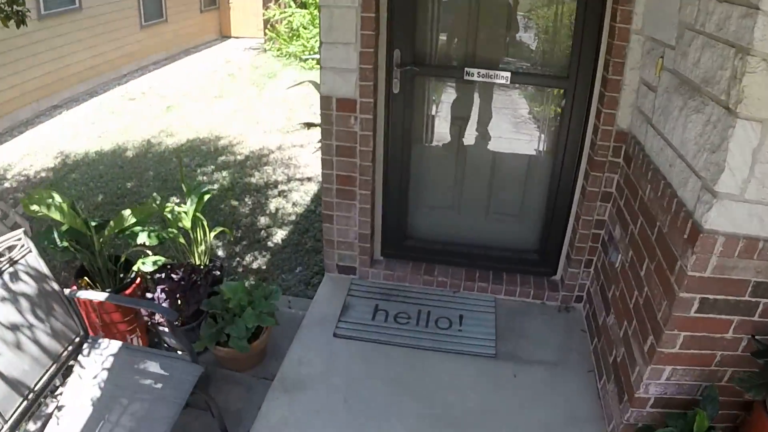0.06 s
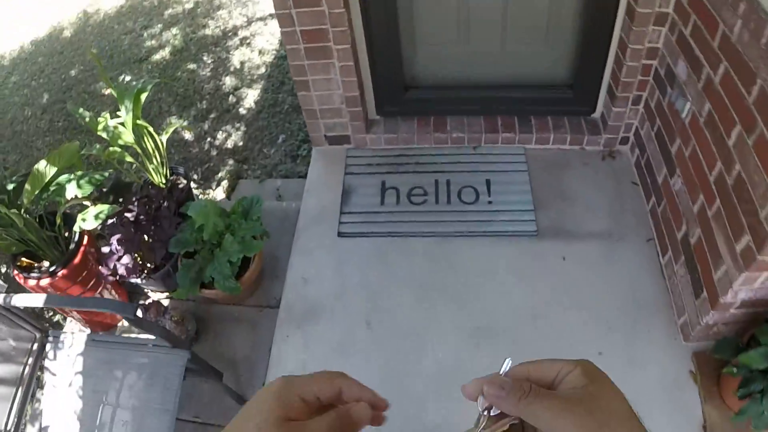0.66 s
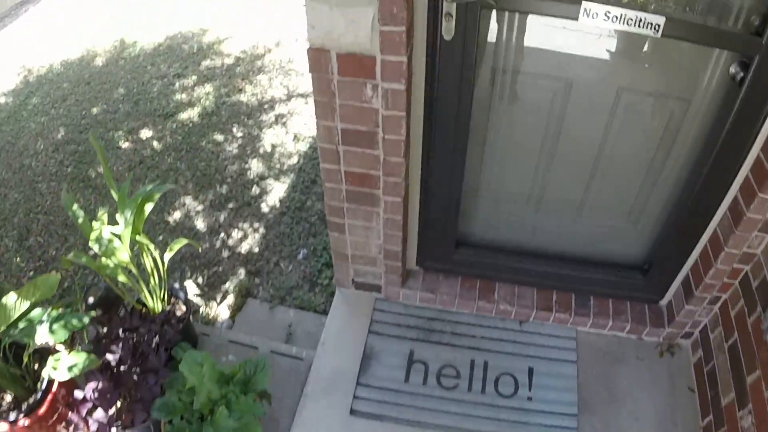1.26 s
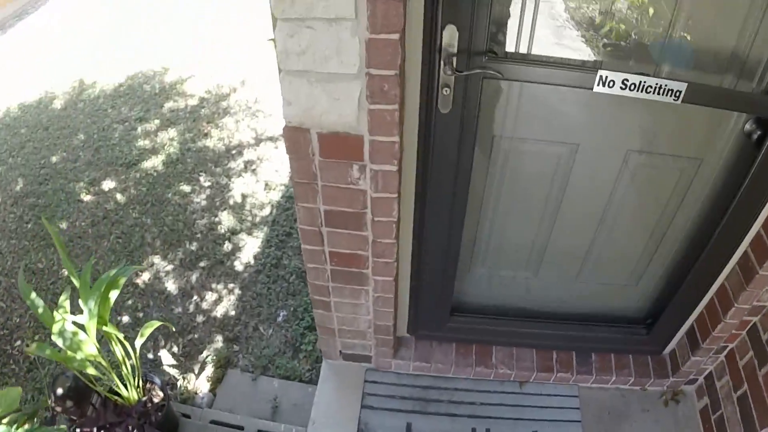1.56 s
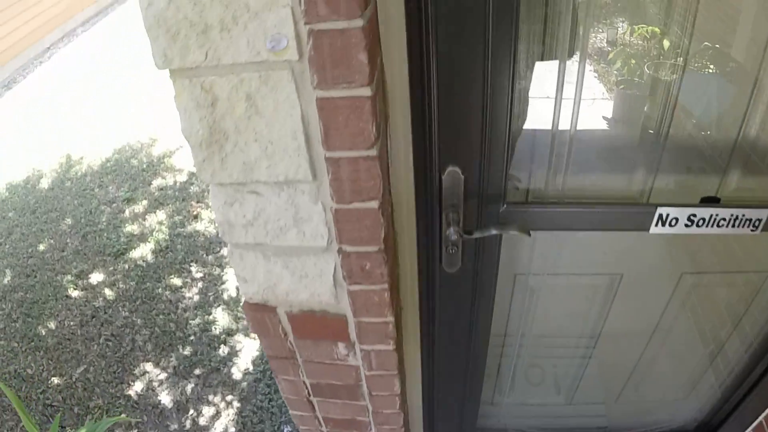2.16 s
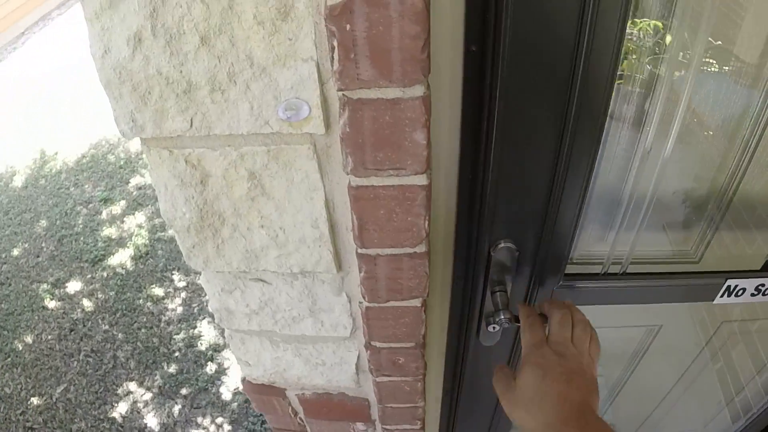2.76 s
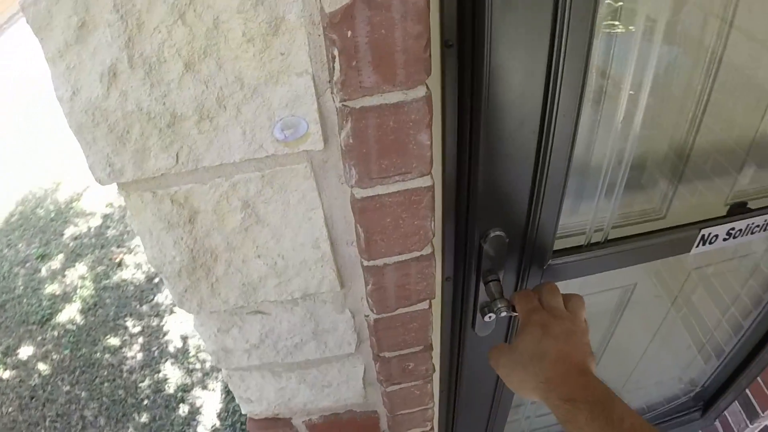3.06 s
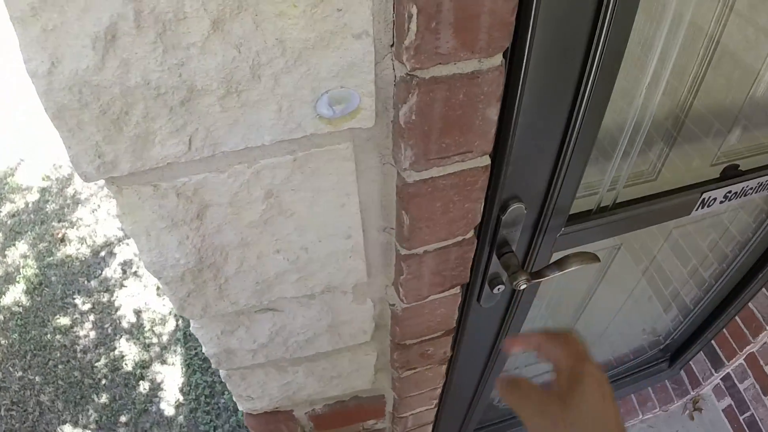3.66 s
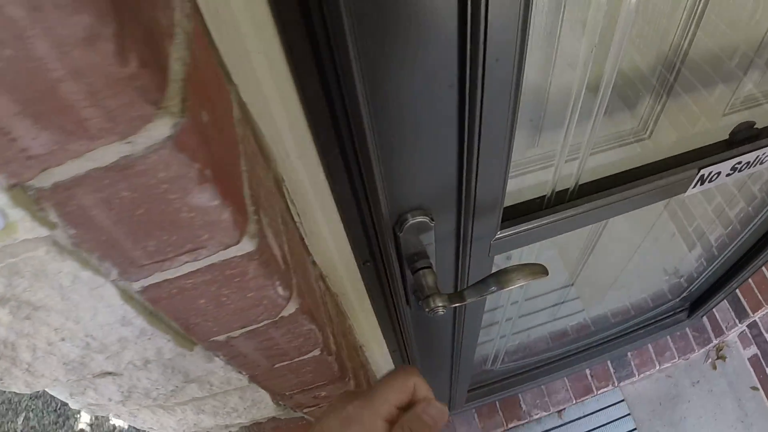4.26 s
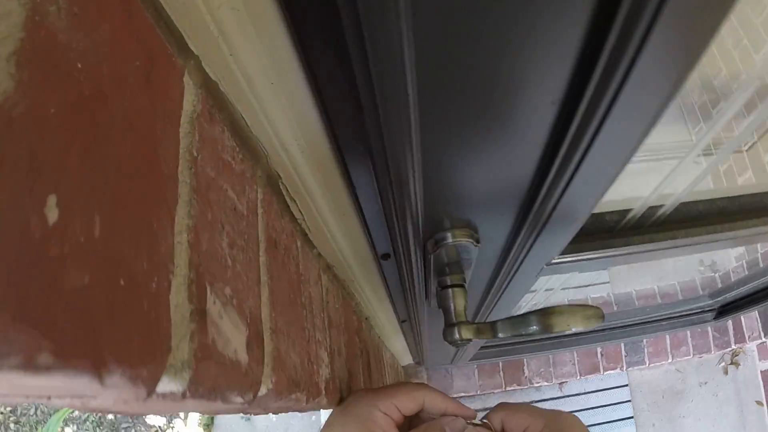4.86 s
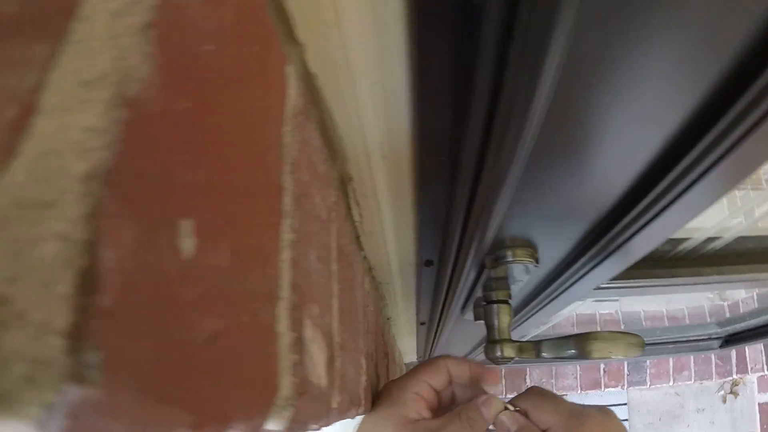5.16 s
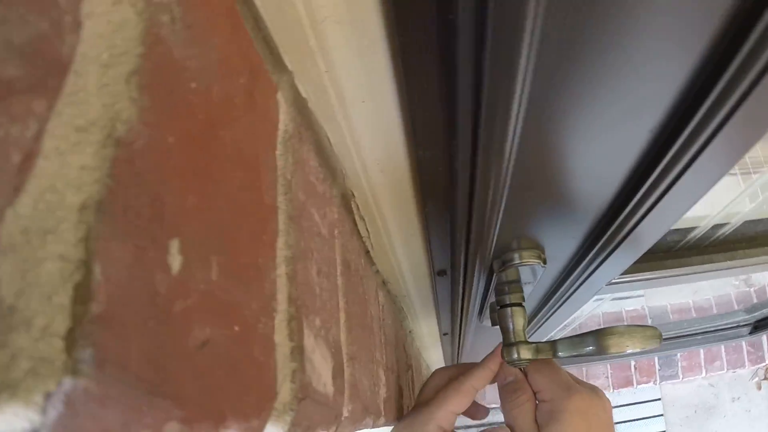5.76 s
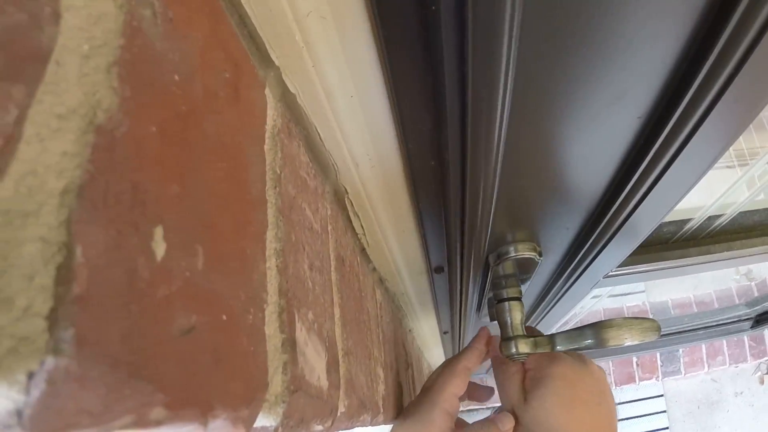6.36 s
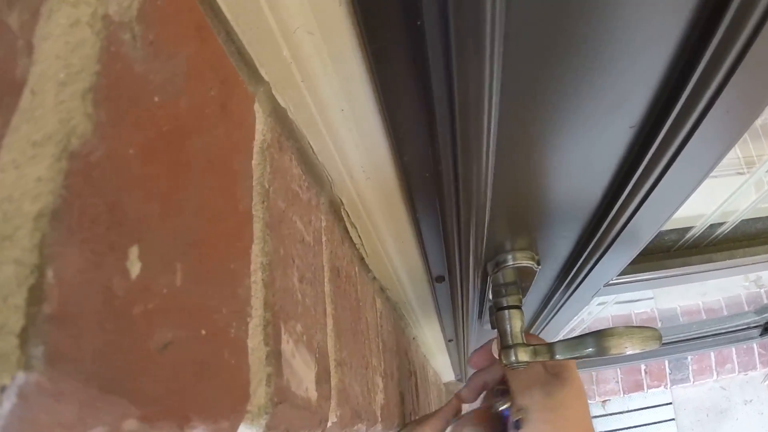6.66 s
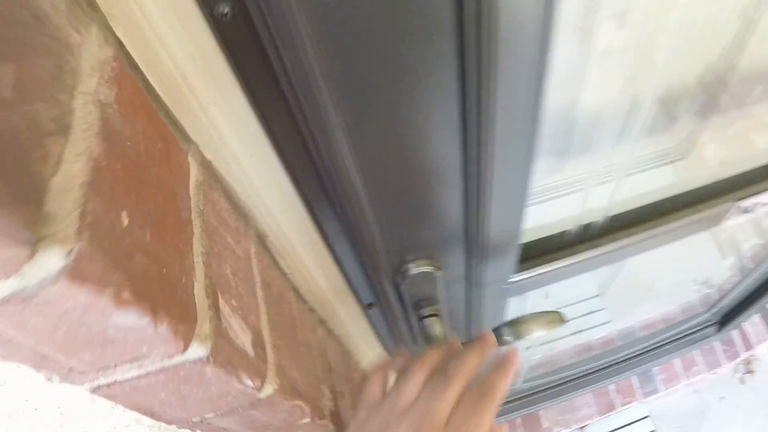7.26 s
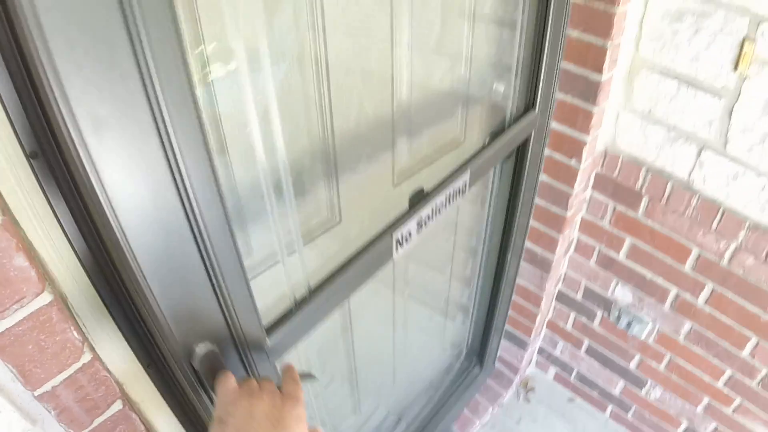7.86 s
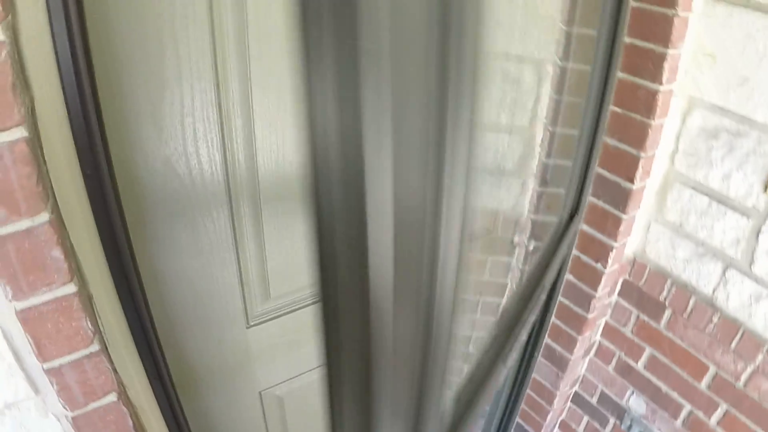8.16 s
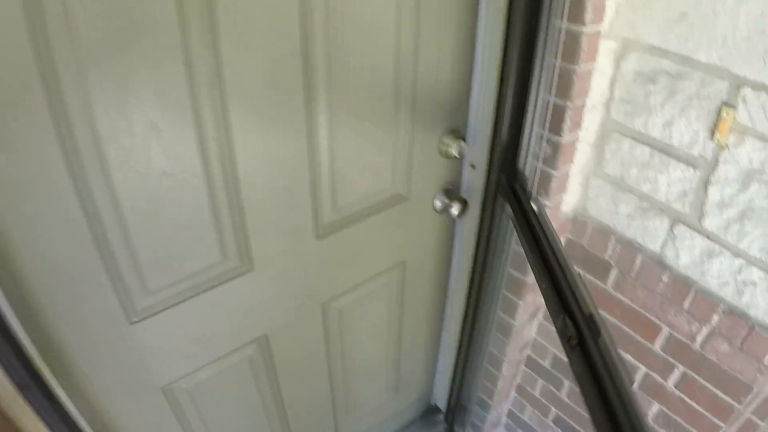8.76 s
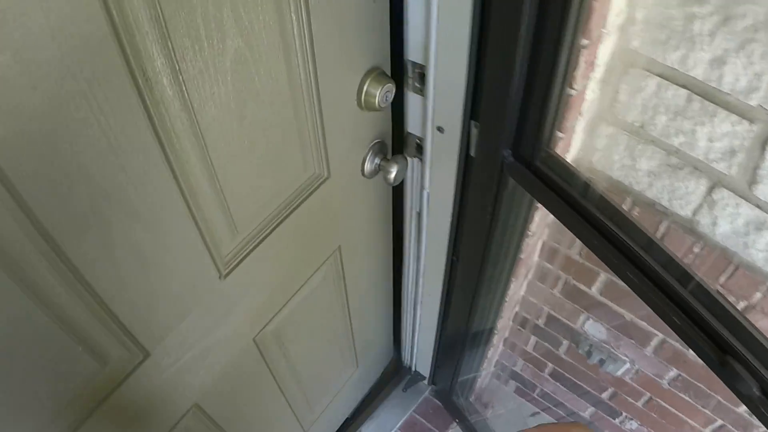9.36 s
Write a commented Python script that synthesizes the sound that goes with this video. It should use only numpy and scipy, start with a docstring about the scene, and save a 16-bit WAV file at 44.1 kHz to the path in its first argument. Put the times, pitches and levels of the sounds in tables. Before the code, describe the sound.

A quiet street hum and a low rumble of air run throughout, heard from a body-worn microphone on a brick porch with short reflections. Keys tick faintly in a hand, then jingle more clearly from about 2 seconds. Between 2.8 and 3.7 seconds a storm door's metal lever is tried, clacking and snapping with soft thuds in the frame. Keys fidget again, and at 5.3 seconds the microphone takes a loud, short knock. From 6.2 seconds the lock clacks and scrapes, with the sharpest snap near 6.8 and another clack at 7.1. The door swings open from about 7.4 seconds with dull knocks, a rattling lever, light rubbing and clinking keys. Around 8.8 seconds come a thud and doorknob clicks with more jingling and a small microphone bump. From 9.2 seconds the wooden front door rubs off its weather seal with brief squeaks.

```python
"""The lever and lock of a metal and glass storm door clack and ring as someone tries it and unlocks it.
Keys tick and jingle in the hand, the door is pulled open with soft thuds in its frame, then the wooden
front door is pushed and rubs off its weather seal. Each metal hit is a crack and a dying chatter of
noise fed through resonances; a brick porch adds short reflections. The body-worn microphone gets
knocked, and a quiet street hums behind it all."""
import sys
import numpy as np
from scipy import signal
from scipy.io import wavfile

SR = 44100
rng = np.random.default_rng(int(sys.argv[2]) if len(sys.argv) > 2 else 0)


def to_wav(sig):
    """Store sig (one row per channel, or 1-D mono) as 16-bit WAV at the path in sys.argv[1].

    Samples outside -1..1 are clipped; the rate is SR.
    """
    pcm = np.clip(np.atleast_2d(sig), -1, 1) * 32767
    pcm = np.round(pcm).astype(np.int16)
    wavfile.write(sys.argv[1], SR, pcm.T)  # frames by channels


N = 419523
TIME = np.arange(N) / SR
AGE = TIME[:SR // 3]   # seconds since a hit
EDGES_HZ = 20 * 2 ** (np.arange(20) * .51)
CENTRES_HZ = np.sqrt(EDGES_HZ[1:] * EDGES_HZ[:-1])
BANK = [signal.butter(2, pair, "band", fs=SR, output="sos") for pair in zip(EDGES_HZ, EDGES_HZ[1:])]

# tone of moving air, open street, street from the door corner, and leaves: freq_hz, density_db
RUMBLE_COLOUR = [(20, 2), (35, 0), (60, 0), (85, 3.5), (115, -6), (160, -13), (250, -10.5), (500, -57)]
STREET_COLOUR = [(60, -11.5), (150, 5.5), (250, 0.5), (450, -2.5), (850, 0.5), (1200, -3), (1800, -16.5),
                 (3000, -23), (8000, -58.5)]
CORNER_COLOUR = [(60, -16.5), (105, 17.5), (150, 3.5), (250, 1), (450, -7), (680, -1), (900, -1),
                 (1250, -21), (1900, -35), (8000, -56)]
RUSTLE_COLOUR = [(600, -7.5), (1500, 5.5), (2600, 0), (4500, -5), (8000, -12.5), (12000, -17.5),
                 (16000, -28)]
# air over the microphone, rising on the step through the door: time_s, level_db
RUMBLE_FADER = [(0, -45.5), (1.2, -45), (1.7, -48), (3.8, -43.5), (7.5, -45.5), (8.3, -41.5), (9.15, -35.5),
                (9.51, -40)]
# distant traffic: time_s, level_db
STREET_FADER = [(0, -46.5), (1.6, -49), (4.2, -51.5), (7.4, -51.5), (8.0, -50.5), (9.51, -50.5)]
# how deep the microphone sits in the corner of door and wall: time_s, shelter_fraction
SHELTER = [(4.3, 0.01), (5.15, 0.92), (6.7, 1), (7.3, 0)]
# shoes and sleeves brushing: start_s, length_s, level_db, centre_hz
SCUFFS = [(0.778, 0.134, -64.5, 2810), (1.379, .48, -60, 2172), (3.654, 0.0446, -49.5, 2060),
          (4.053, 0.0422, -57, 2990), (4.099, 0.0444, -50, 3370), (6, 0.0716, -58.5, 2110)]

# knocks on the microphone housing: start_s, peak_db, pitch_hz, t60_s, crackle_db
BUMPS = [(5.3485, -3.5, 135, 0.011, -21), (5.3669, -11, 133.6, 0.047, -35),
         (5.3803, -21, 150, 0.102, -52.5), (5.414, -29, 152.3, 0.079, -52.5), (9.054, -15, 77, 0.07, -44),
         (9.147, -20, 172.6, 0.0097, -42)]
# scrape after the first knock: start_s, length_s, level_db
HOUSING_SCRAPE = [(5.365, 0.0766, -37)]
# tone of the housing's scrape and crackle: freq_hz, density_db
HOUSING_COLOUR = [(800, 0.5), (2000, -12), (4300, -4), (8000, 0), (11000, -7.5), (15000, -16.5)]
CRACKLE_COLOUR = [(300, 7), (1500, -1.5), (4300, 0), (6500, -7.5), (10000, -8.5), (15000, -27.5)]

# friction of the swinging doors: time_s, level_db
SWING_FADER = [(7.62, -64), (7.72, -42), (7.85, -45), (7.97, -57), (8.36, -52.5), (8.6, -53), (8.78, -52),
               (9.2, -44.5), (9.51, -59)]
# the front door slides off its strike plate, then its weather seal: start_s, length_s, level_db
STRIKE_SLIDE = [(9.0, 0.146, -51.5)]
SEAL_DRAG = [(9.18, 0.232, -39)]
# tone of the swing, the seal and the friction hiss: freq_hz, density_db
SWING_COLOUR = [(120, -2), (280, 0.5), (500, 1.5), (800, -7), (1500, -10), (3000, -15.5), (6000, -27.5),
                (12000, -46.5)]
SEAL_COLOUR = [(200, -18), (450, -0.5), (750, 5), (1100, 4.5), (1600, -0.5), (2200, -0.5), (3200, -7),
               (5000, -15.5), (12000, -34.5)]
HISS_COLOUR = [(1000, -32), (4000, 6.5), (7000, 0), (11000, -2.5), (16000, -7)]
# stick-slip squeaks of closer and seal: start_s, length_s, start_hz, end_hz, level_db
SQUEAKS = [(7.914, 0.0613, 329, 474, -46), (9.261, 0.037, 2045, 1852, -44.5),
           (9.321, 0.0385, 428.3, 430, -37), (9.322, 0.0324, 3209, 3059, -40.5),
           (9.381, 0.036, 2352, 1918, -47), (9.397, 0.0356, 516, 346, -41.5),
           (9.433, 0.0482, 3245, 3240, -48.5), (9.498, 0.0235, 2137, 2100, -43.5)]
# dull knocks on the door frame: start_s, level_db, lowpass_hz
THUDS = [(2.838, -28, 1300), (3.128, -31.5, 250), (3.545, -32.5, 300), (7.408, -31.5, 250),
         (7.485, -35, 250), (8.131, -37.5, 1190), (8.795, -29, 600), (8.806, -28, 900), (8.836, -39.5, 400)]
# modes of frame and pane: pitch_hz, level_db, t60_s
FRAME_MODES = [(165, 3.5, 0.085), (219, 3, 0.192), (285.7, -4, 0.187), (332.3, -6.5, 0.16),
               (381.7, -8, 0.17), (500, 1, 0.0386), (563.8, -3, 0.161), (805, -6.5, 0.099),
               (941, -11.5, 0.092)]

# clinks of the key ring: start_s, level_db, centre_hz
CLINKS = [(3.126, -49.5, 4590), (4.256, -55, 4150), (5.4818, -56, 5130), (7.1846, -39.5, 4960),
          (7.2449, -53.5, 4890), (7.2824, -54, 5427), (7.3965, -42.5, 4440), (7.8163, -51, 4630),
          (8.0735, -41, 4400), (8.974, -39.5, 4210), (9.0518, -40.5, 6610), (9.0987, -44, 4400)]
# runs of small slips along the ring: start_s, end_s, level_db
SLIPS = [(4.18, 4.8, -58), (8.38, 8.52, -54.5)]
# modes of the key ring and of a hanging key: pitch_hz, level_db, t60_s
RING_MODES = [(4160, -0.5, 0.232), (10030, -11.5, 0.27), (10930, -12.5, 0.204)]
KEY_MODES = [(3354, -19, .2), (4829, -21, .15), (5889, -18, .2), (8543, -9, .28), (9092, -2, .25),
             (9170, -9, .15), (11041, -19, .15), (12242, -11, .3), (13071, 1, .28), (13150, -8, .17),
             (15100, -1, .3), (15190, -6, .2)]
# tone of a key tick: freq_hz, density_db
KEY_COLOUR = [(500, -19), (2000, 1), (4000, 0.5), (7000, 2.5), (11000, 1), (14000, -1.5), (16000, -5)]
# the bunch shifts in the hand: start_s, length_s, level_db
KEY_SHIFTS = [(1.1, 0.84, -79), (2.07, 0.165, -57), (2.3, 0.857, -63.5), (3.93, 0.507, -65),
              (4.5, 0.55, -85.5), (6.3, 0.082, -60.5), (7.915, 0.057, -49.5)]
# fingers sort through the keys: start_s, end_s, level_db
FIDGETS = [(1.05, 1.55, -59), (2.2, 3.1, -55.5), (3.9, 4.55, -55), (4.55, 4.95, -60), (9.0, 9.45, -49.5)]
# featured key hits: start_s, level_db, ring_db
KEY_HITS = [(0.40, -54, -6), (1.399, -50, -14.5), (1.545, -50.5, -5), (1.926, -59, 6.5), (2.056, -38.5, 7),
            (2.11, -48, -4.5), (2.17, -50, 12.5), (2.324, -45, -16), (2.514, -50.5, -13), (2.56, -48.5, -6),
            (2.645, -51, -2), (2.702, -42, -0.5), (2.729, -41, 8), (2.802, -49, -11.5), (3.057, -43, -20),
            (3.631, -48, -24.5), (3.985, -46.5, -19), (4.346, -46, -16), (4.392, -44, -10),
            (4.839, -50, -25), (7.948, -43, -12.5), (9.051, -46, -1), (9.335, -47.5, -13)]

# tone of a latch hit: freq_hz, density_db
LATCH_COLOUR = [(80, -33), (200, -4), (400, -6.5), (700, 2), (1400, 3), (2100, 1), (3500, -2.5),
                (5500, -5.5), (8000, -15), (11000, -15), (15000, -28.5)]
# resonances of lock case and door stile, and of lever and return spring: pitch_hz, width_hz, gain_db
CASE_RESONANCES = [(282, 30, -1), (385, 25, -1), (562, 45, -3), (960, 60, -3), (1376, 50, -5),
                   (1660, 50, -3), (1894, 60, 1), (2065, 90, 2), (2210, 65, 2), (2330, 38, 1),
                   (2610, 50, 3), (3020, 40, 2), (3376, 45, 2), (3574, 60, 3), (4285, 40, 3), (5330, 50, 1),
                   (5995, 50, 2), (7490, 67, 4)]
LEVER_RESONANCES = [(1120, 6, -5), (10400, 160, -2), (10620, 90, -2)]
# key and lever slide in the lock: start_s, length_s, level_db
LOCK_SCRAPES = [(6.30, 0.024, -37.5), (6.33, 0.0633, -37), (6.40, 0.111, -48.5), (6.62, 0.09, -51.5),
                (6.95, 0.092, -48), (7.04, 0.0536, -32)]
# the loose lever rattles as the door swings: start_s, end_s, level_db
RATTLES = [(7.46, 7.52, -42.5), (7.6, 7.72, -46.5), (8.03, 8.07, -43.5), (8.19, 8.26, -47)]
# hits of the front door's knob and the storm door's latch: start_s, level_db, bass_db, treble_db
KNOB_HITS = [(8.798, -40, 25, -1), (8.883, -39.5, 11, 1.5), (8.975, -38.5, 10.5, -14.5),
             (9.146, -40, 7, 3.5), (9.222, -34, 5.5, 1.5), (9.398, -39.5, 15.5, -8.5)]
LATCH_HITS = [(2.167, -37.5, -5.5, 5), (2.948, -36, 14, 0), (3.009, -44, 1.5, 5), (3.424, -45, -11.5, -3),
              (3.468, -36, -21, 6.5), (3.487, -25, -14.5, 3), (3.499, -33, 7.5, -2),
              (3.532, -35.5, 11.5, -2), (5.809, -47, -1.5, -15), (6.216, -21, -2.5, 3),
              (6.242, -24.5, 3, 0.5), (6.33, -26, 1, -2), (6.349, -22.5, -5.5, -0.5), (6.376, -30, 5, 3),
              (6.394, -29.5, 8.5, -14.5), (6.483, -40, 18.5, -24), (6.575, -42.5, 12, 0.5),
              (6.678, -40, 15, 8), (6.707, -28, 4.5, -5), (6.923, -33.5, 6.5, 11),
              (6.933, -32.5, -0.5, -4.5), (7.041, -32, -1, -4), (7.115, -17.5, -3, 4.5),
              (7.41, -36.5, 5.5, -4.5), (7.445, -37.5, -7, -9), (7.551, -27, 5, 1), (7.991, -42, -4, -1.5),
              (8.073, -37.5, -18.5, 6.5), (8.121, -32.5, 10.5, -9), (8.13, -37.5, 14, -11),
              (8.18, -37, -0.5, -20.5), (8.337, -39, 15.5, 5.5), (8.497, -44.5, 5, -12.5)]
# the bolt snaps over: seating_s, level_db, bass_db, treble_db, travel_s, spring_db
BOLT_SNAPS = [(2.827, -29, 11, 2, 0.0048, -12.5), (2.902, -24, 4, 10.5, 0.0059, 3.5),
              (3.709, -18.5, 4, 7.5, 0.00963, -6.5), (6.763, -11.5, 0.5, 7.5, .010, -21)]


def from_db(db):
    """Decibels to gain."""
    return 10 ** (np.asarray(db) / 20)


def rms_one(x):
    """Scale to rms 1."""
    return x / np.sqrt(np.mean(x ** 2) + 1e-20)


def onset_one(x):
    """Scale a hit to rms 1 over its first 8 ms."""
    return x / np.sqrt(np.mean(x[:SR // 125] ** 2) + 1e-20)


def at_bands(colour):
    """A tone curve in dB at the centres of the filter bank."""
    hz, db = np.transpose(colour)
    return np.interp(np.log(CENTRES_HZ), np.log(hz), db)


def decay(t60):
    """Envelope that falls 60 dB in t60 seconds."""
    return np.exp(-np.log(1000) * AGE / t60)


def add(out, s, x):
    """Mix a sound in at s seconds."""
    i = int(s * SR)
    out[i:i + len(x)] += x[:N - i]


def coloured(sources, band_db):
    """Graphic EQ whose bands are fed alternately by two sources."""
    return sum(gain * signal.sosfilt(BANK[k], sources[k % 2] + 1e-18)
               for k, gain in enumerate(from_db(band_db)))


def drift(rate_hz, size):
    """Smooth random modulation."""
    position = np.arange(size) * rate_hz / SR
    count = int(position[-1]) + 2
    return np.interp(position, np.arange(count), rng.standard_normal(count))


def noise(colour, grain_db=0, grain_hz=250):
    """Coloured noise of rms 1, roughened by a random flutter in level."""
    grains = rng.standard_normal((2, N)) * from_db(grain_db * drift(grain_hz, N))
    return rms_one(coloured(grains, at_bands(colour)))


def resonate(x, hz, width_hz):
    """Two-pole resonance with unity gain at its peak."""
    r = np.exp(-np.pi * width_hz / SR)
    feedback = [1, -2 * r * np.cos(2 * np.pi * hz / SR), r * r]
    return signal.lfilter(np.array([1, 0, -1]) * (1 - r * r) / 2, feedback, x + 1e-18)


def struck(modes, scatter_db):
    """Decaying sines; each hit feeds the modes a little differently."""
    return sum(from_db(db + scatter_db * rng.standard_normal()) * np.sin(2 * np.pi * hz * AGE)
               * decay(t60) for hz, db, t60 in modes)


def clack(t60, crack, chatter_db):
    """A sharp transient, then the dense dying chatter of loose parts."""
    burst = rng.standard_normal((2, len(AGE))) * decay(t60)
    burst *= from_db(chatter_db * drift(908.4, len(AGE)))
    burst[:, 0] += crack
    return burst


def spot_modes(burst, low_hz, high_hz, level_db, q, count=7):
    """Each point of contact favours a few modes of its own."""
    pitches = low_hz * (high_hz / low_hz) ** ((np.arange(count) + rng.random(count)) / count)
    return burst + from_db(level_db) * sum(resonate(burst, hz, hz / q) for hz in pitches)


def rasp(length_s, hz, width_hz, grain_db=4.5):
    """A grainy swell of noise in one steep resonance, rms 1."""
    size = int(length_s * SR)
    grains = rng.standard_normal(size) * from_db(grain_db * drift(310.1, size))
    band = resonate(resonate(grains, hz, width_hz), hz, width_hz)
    return rms_one(band * signal.windows.tukey(size, .8))


def fader(points):
    """Level automation, silent before its first point."""
    return from_db(np.interp(TIME, *np.transpose(points), left=-120))


def strokes(rows, attack_s, release_s, sag_db_per_s=0):
    """Rubbing envelopes: swell, hold as the pressure sags, fall 60 dB over the release."""
    out = np.zeros(N)
    for s, length_s, db in rows:
        age = TIME[:int((length_s + release_s) * SR)]
        release = np.exp(-np.log(1000) * np.maximum(age - length_s, 0) / release_s)
        add(out, s, from_db(db - sag_db_per_s * age) * np.minimum(age / attack_s, 1) * release)
    return out


def scattered(spans, per_s, spread_db):
    """Loosely spaced triggers within each span: start_s, level_db."""
    events = []
    for start, end, db in spans:
        count = max(round((end - start) * per_s), 1)
        for k, (when, force) in enumerate(rng.random((count, 2))):
            events.append((start + (end - start) * (k + when) / count, db + spread_db * (2 * force - 1)))
    return events


def street_bed(corner_db=5, rustle_db=-59, rustle_shelter_db=-2.5):
    """Distant traffic, duller in the corner; air moving over the microphone; leaves and clothing."""
    shelter = np.interp(TIME, *np.transpose(SHELTER))
    traffic = np.sqrt(1 - shelter) * noise(STREET_COLOUR, grain_db=1.65, grain_hz=15)
    traffic += np.sqrt(shelter) * from_db(corner_db) * noise(CORNER_COLOUR, grain_db=1.8, grain_hz=7.9)
    rumble = fader(RUMBLE_FADER) * noise(RUMBLE_COLOUR, grain_db=2, grain_hz=20)
    rustle = noise(RUSTLE_COLOUR, grain_db=1, grain_hz=25)
    return rumble + fader(STREET_FADER) * traffic + from_db(rustle_db + rustle_shelter_db * shelter) * rustle


def porch(x, t60=0.1986, build_s=0.00502, wall_hz=6000):
    """Dense, slightly dull reflections from the brick alcove."""
    tail = rng.standard_normal(len(AGE)) * decay(t60) * np.minimum(AGE / build_s, 1) ** 2
    tail = signal.sosfilt(signal.butter(1, wall_hz, fs=SR, output="sos"), tail / np.linalg.norm(tail))
    return signal.fftconvolve(x, tail)[:N]


def scuffs():
    """Soles and cloth brush past."""
    out = np.zeros(N)
    for s, length_s, db, hz in SCUFFS:
        add(out, s, from_db(db) * rasp(length_s, hz, width_hz=1010))
    return out


def mic_bumps(overtone_gain=0.307, overtone_ratio=2.052):
    """Knocks on the housing: heavily damped low thumps with a plastic crackle, and one short scrape."""
    out = strokes(HOUSING_SCRAPE, attack_s=0.0063, release_s=0.13, sag_db_per_s=99)
    out *= noise(HOUSING_COLOUR, grain_db=5.5, grain_hz=400)
    for s, db, hz, t60, crackle_db in BUMPS:
        phase = 2 * np.pi * hz * AGE
        thump = -(np.sin(phase) + overtone_gain * np.sin(overtone_ratio * phase)) * decay(t60)
        crackle = coloured(clack(t60=0.01475, crack=7.7, chatter_db=-8), at_bands(CRACKLE_COLOUR))
        add(out, s, from_db(db) * thump / np.abs(thump).max() + from_db(crackle_db) * onset_one(crackle))
    return out


def squeak(length_s, start_hz, end_hz, waver=0.0382, waver_hz=588):
    """Stick-slip: a short wavering glide that swells and fades, rms 1."""
    size = int(length_s * SR)
    hz = np.linspace(start_hz, end_hz, size) * (1 + waver * drift(waver_hz, size))
    return rms_one(np.sin(2 * np.pi * np.cumsum(hz) / SR) * signal.windows.tukey(size, .7))


def door_friction(hiss_db=-40.5, hiss_exponent=0.382):
    """The swinging doors rub and hiss, the weather seal drags, and closer and seal squeak."""
    rub = fader(SWING_FADER)
    hiss = from_db(hiss_db) * rub ** hiss_exponent + strokes(STRIKE_SLIDE, attack_s=0.065, release_s=0.32)
    drag = strokes(SEAL_DRAG, attack_s=0.048, release_s=0.077)
    out = rub * noise(SWING_COLOUR)
    out += hiss * noise(HISS_COLOUR, grain_db=5, grain_hz=100)
    out += drag * noise(SEAL_COLOUR, grain_db=3, grain_hz=350)
    for s, length_s, start_hz, end_hz, db in SQUEAKS:
        add(out, s, from_db(db) * squeak(length_s, start_hz, end_hz))
    return out


def frame_thuds():
    """Soft blows wake the low modes of frame and pane; some are muffled, some brighter."""
    out = np.zeros(N)
    for s, db, lowpass_hz in THUDS:
        softness = signal.butter(1, lowpass_hz, fs=SR, output="sos")
        thud = signal.sosfilt(softness, struck(FRAME_MODES, scatter_db=5.5))
        add(out, s, from_db(db) * onset_one(thud))
    return out


def key_ring(slip_hz=4750, slip_spread=0.163, ring_db=-13, detune=.06):
    """Steel slips on steel with a harsh chip, then rings faintly, at a new pitch each time."""
    out = np.zeros(N)
    slips = [(s, db, slip_hz * (1 + slip_spread * rng.standard_normal()))
             for s, db in scattered(SLIPS, per_s=12, spread_db=2.5)]
    for s, db, hz in [*CLINKS, *slips]:
        tuning = 1 + detune * rng.standard_normal()
        modes = [(mode_hz * tuning, level, t60) for mode_hz, level, t60 in RING_MODES]
        add(out, s, from_db(db) * rasp(length_s=0.0151, hz=hz, width_hz=1080))
        add(out, s, from_db(db + ring_db) * onset_one(struck(modes, scatter_db=3)))
    return out


def keys(tick_db=-2, sympathy_db=9, fidget_ring_db=-13, gripped_below_db=-6):
    """Gripped keys tick with a short, lower ring; free ones ring on, fluttering against the others."""
    out = strokes(KEY_SHIFTS, attack_s=0.025, release_s=0.186)
    out *= noise(KEY_COLOUR, grain_db=10.5, grain_hz=220)
    out += sum(from_db(db + sympathy_db) * resonate(out, hz, width_hz=71) for hz, db, _ in KEY_MODES)
    fidgets = [(s, db, fidget_ring_db) for s, db in scattered(FIDGETS, per_s=10, spread_db=2)]
    for s, db, ring_db in [*KEY_HITS, *fidgets]:
        tick = coloured(clack(t60=0.0797, crack=15, chatter_db=8.5), at_bands(KEY_COLOUR))
        tick = spot_modes(tick, low_hz=4001, high_hz=15205, level_db=8.5, q=128)
        tick = from_db(tick_db) * onset_one(tick)
        flutter = from_db(2.5 * drift(110, len(AGE)))
        detune = rng.uniform(.8, .99)
        tuning, sustain = (detune, .45) if ring_db < gripped_below_db else (1, 1)
        modes = [(hz * tuning, level, t60 * sustain) for hz, level, t60 in KEY_MODES]
        ring = from_db(ring_db) * onset_one(struck(modes, scatter_db=3)) * flutter
        add(out, s, from_db(db) * (tick + ring) / np.hypot(1, from_db(ring_db)))
    return out


def metal_hit(db, bass_db, treble_db, t60):
    """One metal-on-metal clack with bass and treble shelves; db sets the level of its mids."""
    bass_shelf = np.interp(np.log(CENTRES_HZ), np.log([550, 1200]), [1, 0])
    treble_shelf = np.interp(np.log(CENTRES_HZ), np.log([3500, 8000]), [0, 1])
    band_db = at_bands(LATCH_COLOUR) + bass_shelf * bass_db + treble_shelf * treble_db
    power = from_db(band_db) ** 2 * CENTRES_HZ
    mids = (CENTRES_HZ > 800) & (CENTRES_HZ < 6000)
    hit = coloured(clack(t60, crack=3.01, chatter_db=1.5), band_db)
    hit = onset_one(spot_modes(hit, low_hz=586.2, high_hz=10574, level_db=3.5, q=20.2))
    return from_db(db) * hit * np.sqrt(power.sum() / power[mids].sum())


def case_t60(s, free_t60=0.1044, held_t60=0.0666):
    """The lock case rings shorter while the hand presses on it."""
    return held_t60 if 6.1 < s < 7.2 else free_t60


def latch(case_db=-2, lever_db=-4, touch_db=-3.5, touch_treble_db=-9.5, seated_sustain=0.835):
    """Lever, bolt, key and knob strike and slide, ringing through lock case, door stile and lever."""
    out = strokes(LOCK_SCRAPES, attack_s=0.0096, release_s=0.154, sag_db_per_s=7.5)
    out *= noise(LATCH_COLOUR, grain_db=5, grain_hz=460)
    for s, db, bass_db, treble_db, travel_s, spring_db in BOLT_SNAPS:
        # a double hit: the bolt touches, weak and dull, then seats; its spring adds bite
        touch = metal_hit(db + touch_db, bass_db, treble_db + touch_treble_db, case_t60(s))
        seating = metal_hit(db, bass_db, treble_db, seated_sustain * case_t60(s))
        for when, hit in (s - travel_s, touch), (s, seating):
            add(out, when, hit + from_db(spring_db) * resonate(hit, hz=2150, width_hz=420))
    for s, db, bass_db, treble_db in LATCH_HITS:
        add(out, s, metal_hit(db, bass_db, treble_db, case_t60(s)))
    for s, db, bass_db, treble_db in KNOB_HITS:
        add(out, s, metal_hit(db, bass_db, treble_db, t60=0.04))
    for s, db in scattered(RATTLES, per_s=10, spread_db=1):
        add(out, s, metal_hit(db, bass_db=1, treble_db=-13, t60=case_t60(s)))
    case = sum(from_db(db + case_db) * resonate(out, hz, width) for hz, width, db in CASE_RESONANCES)
    lever = sum(from_db(db + lever_db) * resonate(out, hz, width) for hz, width, db in LEVER_RESONANCES)
    return out + case + lever


def scene(porch_send_db=-11.5):
    """Mono mix: doors, keys and scuffs feed the porch reverb; bumps and street stay dry."""
    foley = latch() + keys() + key_ring() + frame_thuds() + door_friction() + scuffs()
    return (foley + porch(from_db(porch_send_db) * foley) + mic_bumps() + street_bed())[None]


def record(dry, cutoff_hz=15450):
    """Clip at full scale, then cut the top with a steep low-pass."""
    return signal.sosfilt(signal.ellip(10, .2, 80, cutoff_hz, fs=SR, output="sos"), np.clip(dry, -1, 1))


dry = scene()
out = record(dry)
to_wav(out)
```